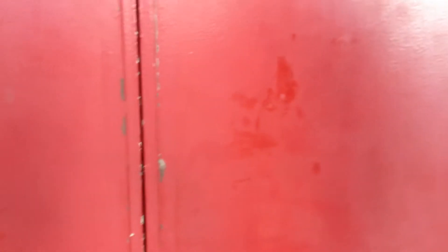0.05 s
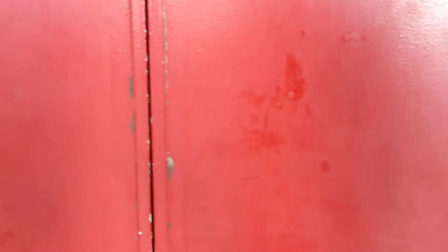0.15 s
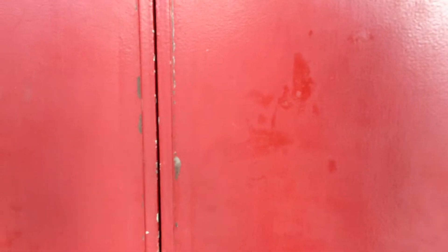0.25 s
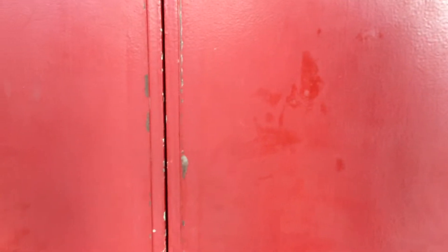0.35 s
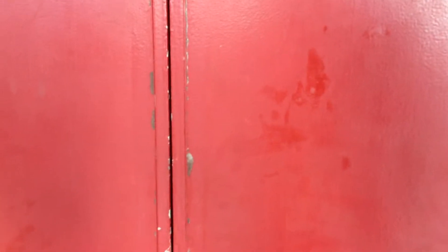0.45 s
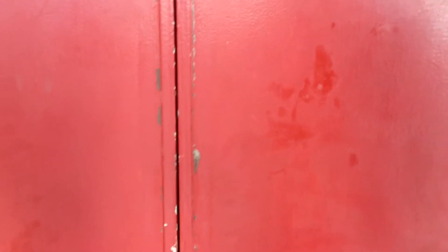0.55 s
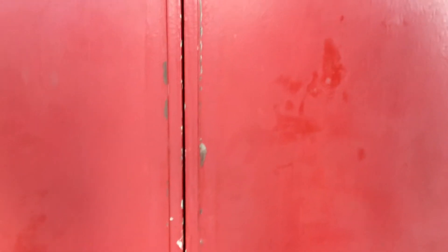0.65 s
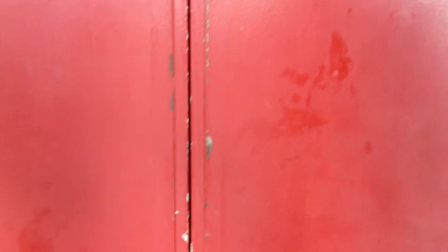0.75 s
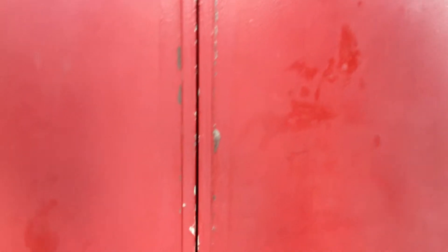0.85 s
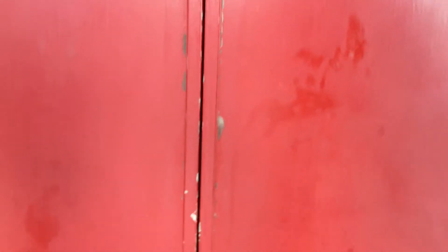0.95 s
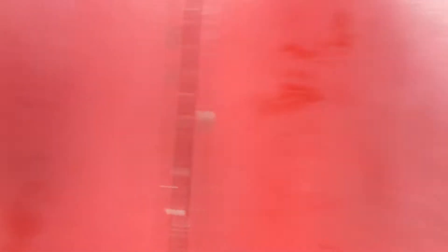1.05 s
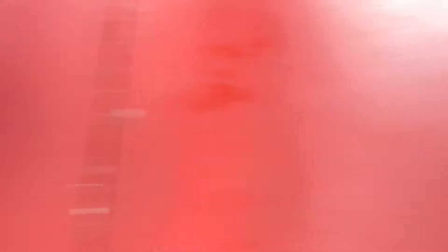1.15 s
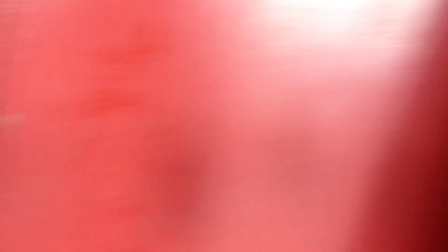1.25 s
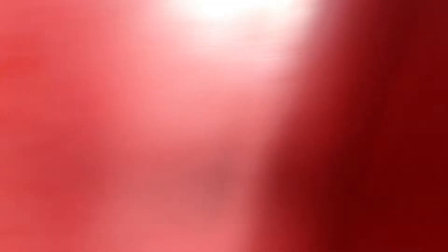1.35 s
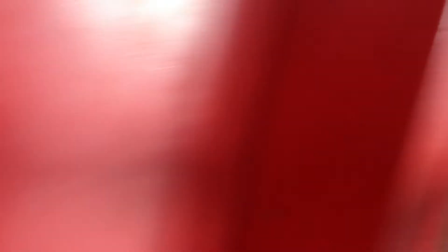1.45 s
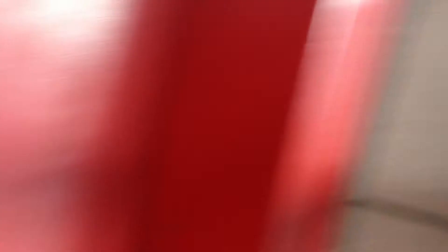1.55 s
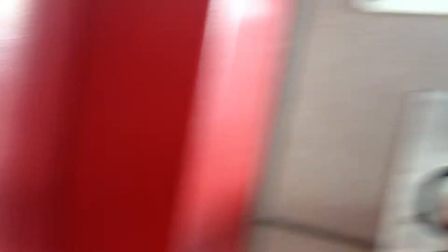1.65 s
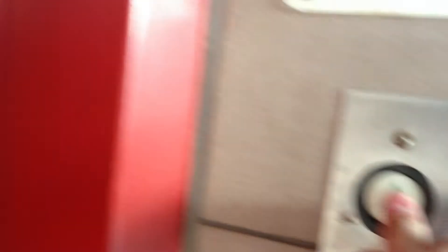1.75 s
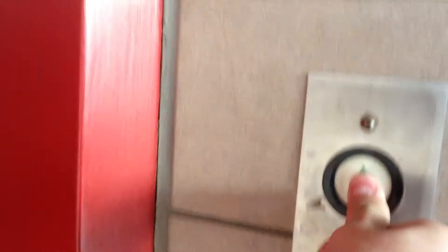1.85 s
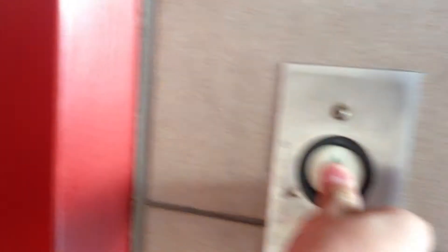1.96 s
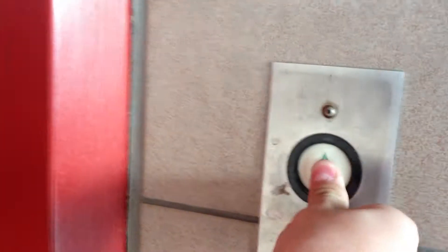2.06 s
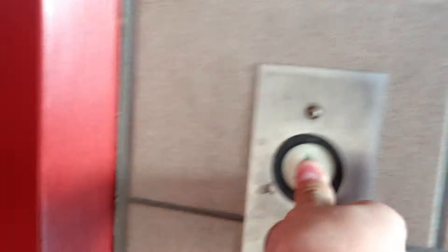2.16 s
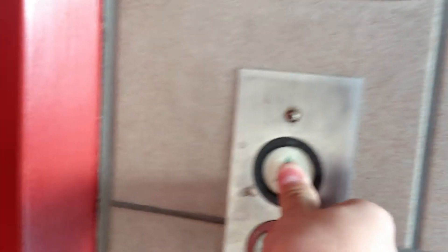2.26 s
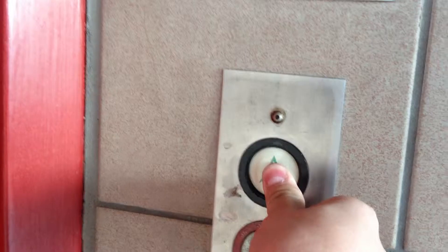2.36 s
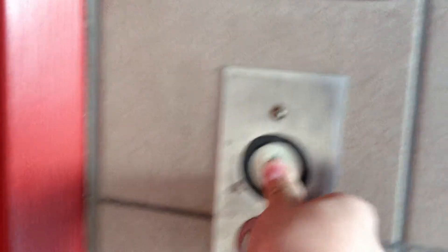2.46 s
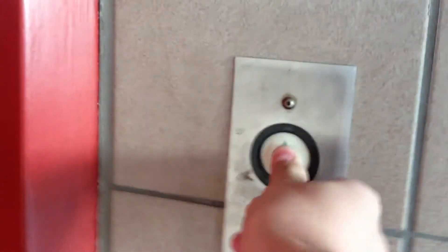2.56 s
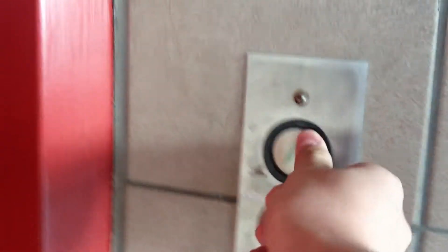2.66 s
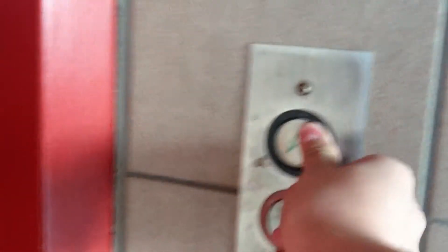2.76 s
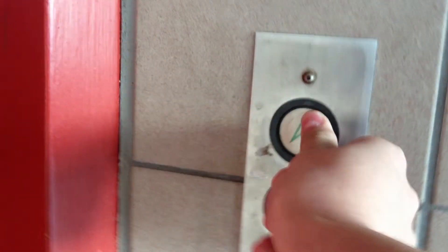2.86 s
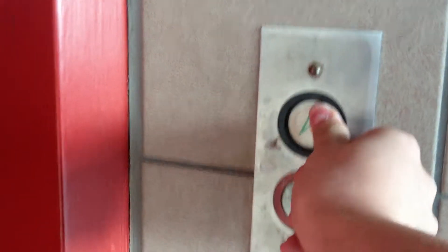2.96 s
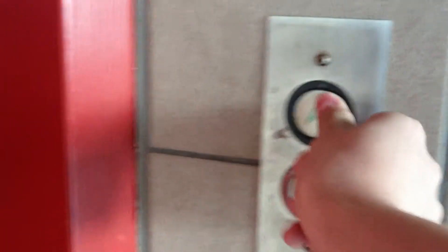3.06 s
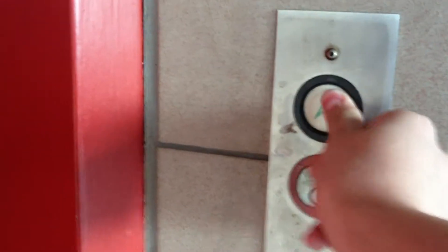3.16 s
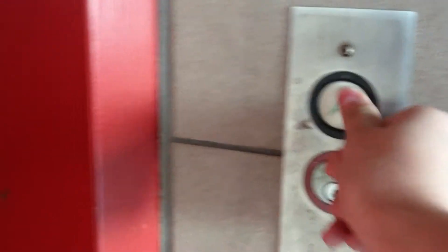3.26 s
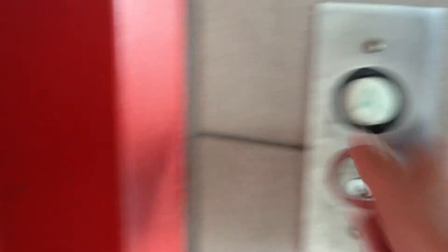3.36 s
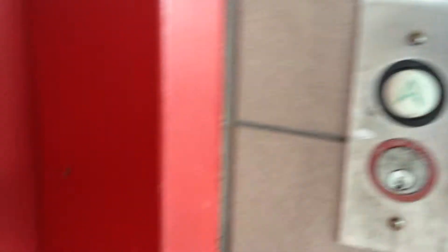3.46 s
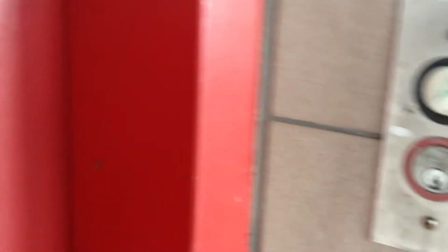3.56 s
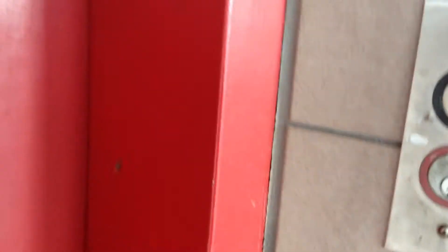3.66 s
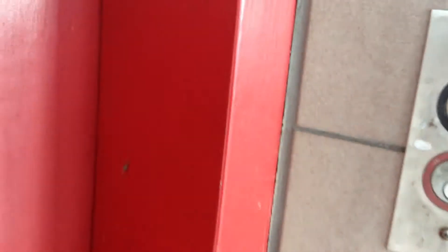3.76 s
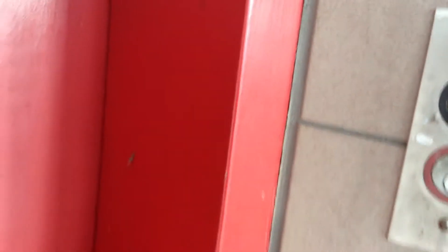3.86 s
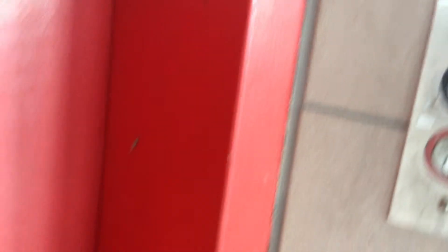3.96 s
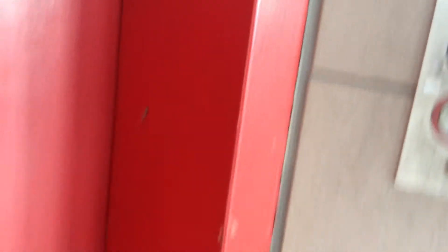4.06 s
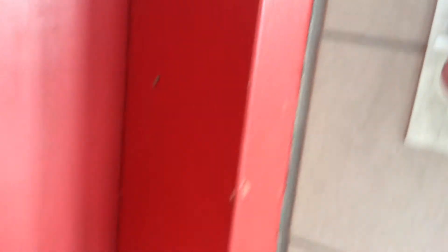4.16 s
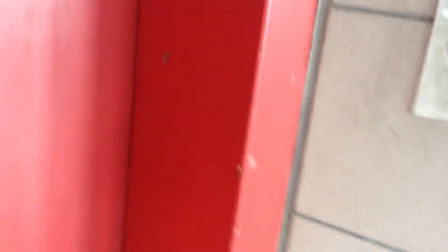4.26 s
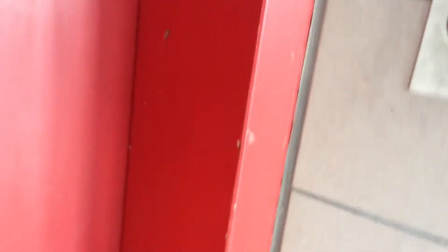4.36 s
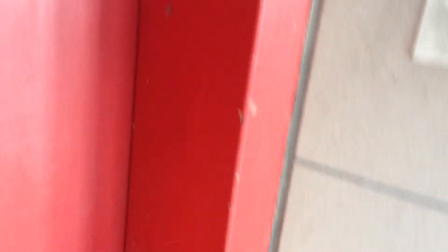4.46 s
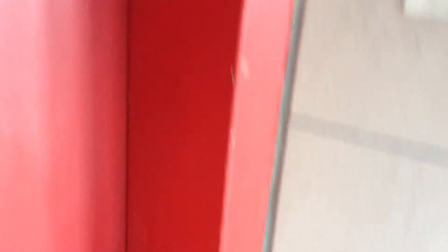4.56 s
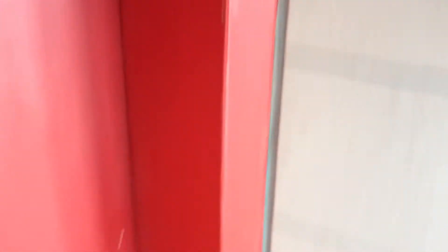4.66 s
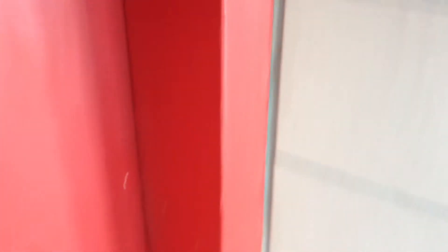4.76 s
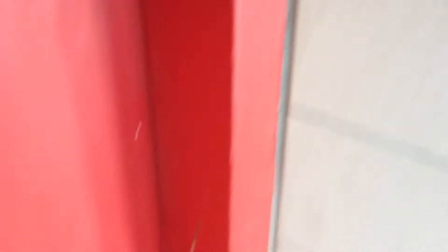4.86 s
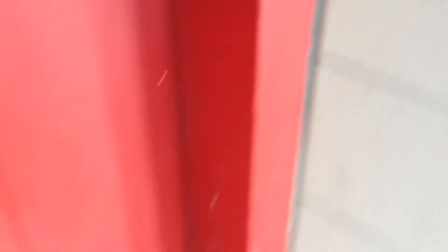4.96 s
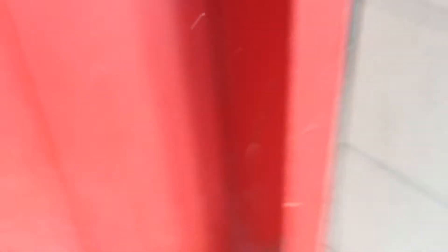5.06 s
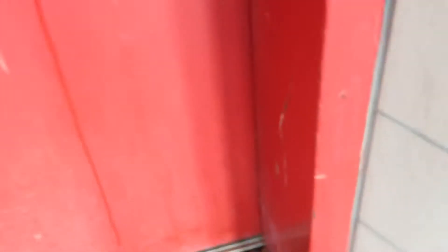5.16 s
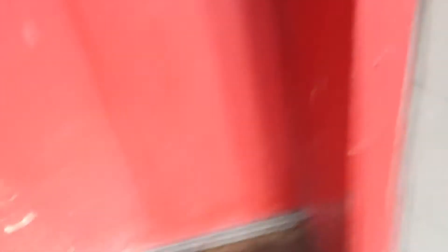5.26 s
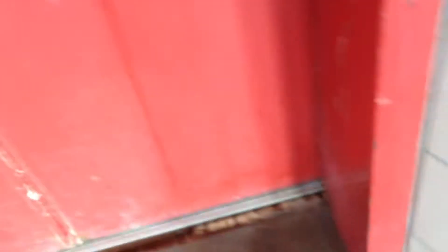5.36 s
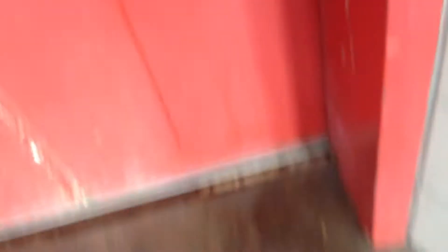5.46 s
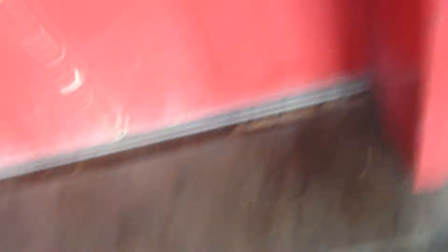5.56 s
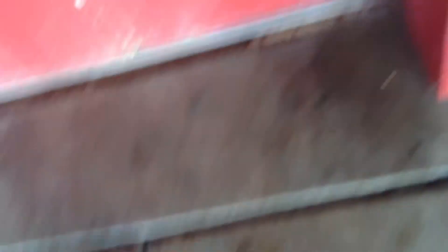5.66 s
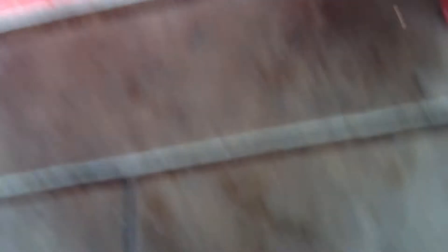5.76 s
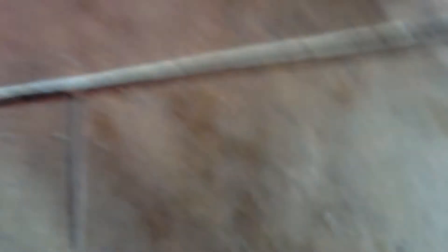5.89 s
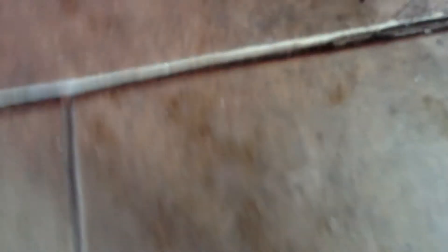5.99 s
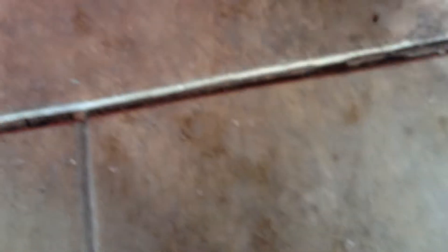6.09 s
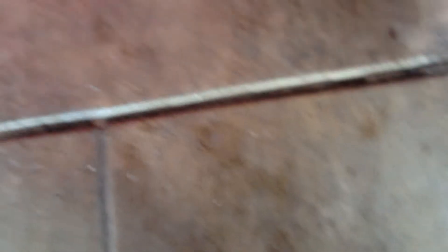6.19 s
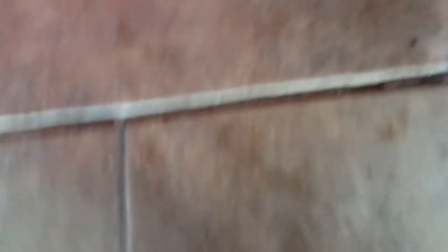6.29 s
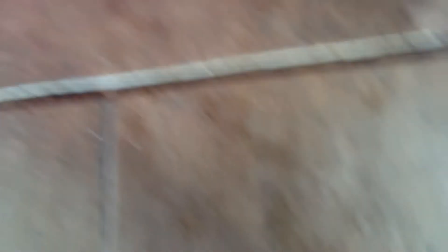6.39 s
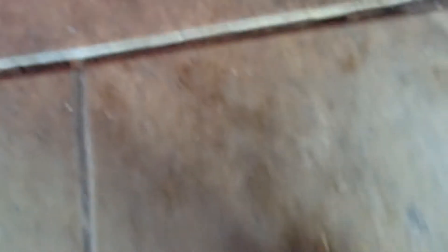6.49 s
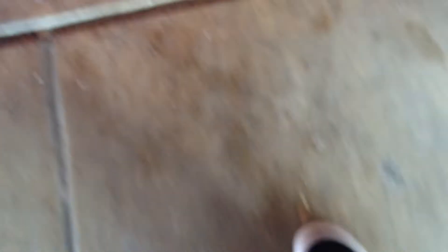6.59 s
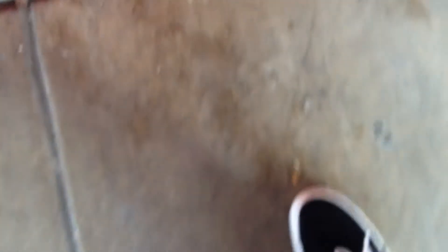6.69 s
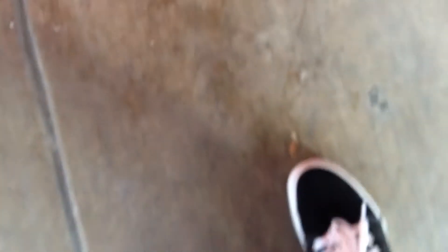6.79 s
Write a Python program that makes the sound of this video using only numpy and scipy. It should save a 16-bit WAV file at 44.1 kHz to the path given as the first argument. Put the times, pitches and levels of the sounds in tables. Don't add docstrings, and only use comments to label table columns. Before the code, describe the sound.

A loose call button clicks and rattles in quick bursts beside a lift door, over a low uneven engine hum and soft traffic noise.

```python
import sys
import numpy as np
from scipy import signal
from scipy.fft import rfft, irfft, next_fast_len
from scipy.io import wavfile
from scipy.ndimage import uniform_filter1d, map_coordinates

SR = 44100
rng = np.random.default_rng(int(sys.argv[2]) if len(sys.argv) > 2 else 0)


def makeup_ratio(level_db):
    decades = np.asarray(level_db, float) / 20
    return 10 ** decades


def store_wav(level_fs):
    pcm = np.round(np.clip(np.atleast_2d(level_fs), -1, 1) * 32767)
    wavfile.write(sys.argv[1], SR, pcm.T.astype(np.int16))


N = 301203
TIME = np.arange(N) / SR

# f/Hz, density/dB
HISS_SPECTRUM = [(1650, -15), (2800, -13.5), (3720, -8), (4050, -5.5), (5230, 4), (5740, 0.5), (6340, -8),
                 (9170, -24.5), (9990, -24.5), (12100, -17.5), (15300, -21.5)]


def unit(x):
    return x / np.sqrt(np.mean(x ** 2) + 1e-20)


def peak(x):
    return x / np.abs(x).max()


def along(points, hz):
    f, v = np.transpose(points)
    return np.interp(np.log(hz + 1), np.log(f + 1), v)


def curves(rows):
    s, *cols = np.transpose(rows)
    return [np.interp(TIME, s, c) for c in cols]


def wobble(rate):
    return map_coordinates(rng.standard_normal(int(N * rate / SR) + 4), [TIME * rate])


def gate(t0, t1, fade):
    return np.clip(np.minimum(TIME - t0, t1 - TIME) / fade, 0, 1)


def tone(hz, db):
    return np.sqrt(2) * makeup_ratio(db) * np.sin(2 * np.pi * (np.cumsum(hz) / SR + rng.random()))


def filtered(x, response):
    m = next_fast_len(len(x) + 4096)
    return irfft(rfft(x, m) * response(np.fft.rfftfreq(m, 1 / SR)), m)[:len(x)]


def ringing(x, modes):
    def response(f):
        total = 0
        for k, (centre, width, db) in enumerate(modes):
            damping = 1j * f * width
            total = total + (-1) ** k * makeup_ratio(db) * damping / (centre * centre - f * f + damping)
        return total
    return filtered(x, response)


def ringing_twice(x, modes):
    return ringing(ringing(x, modes), modes)


def rush(spectrum, patchy_db):
    z = signal.stft(rng.standard_normal(N + 512), nperseg=512)[2]
    field = uniform_filter1d(uniform_filter1d(rng.standard_normal(z.shape), 6, 0), 14, 1)
    x = signal.istft(z * makeup_ratio(patchy_db * unit(field)), nperseg=512)[1][:N]
    return unit(filtered(x, lambda hz: makeup_ratio(along(spectrum, hz))))


def add_at(out, s, sound):
    out[round(s * SR):][:len(sound)] += sound


def idling():
    # f/Hz, width/Hz, level/dB
    pipe = [
        [(140, 60, -6), (183, 55, 0)],
        [(297, 45, 0), (352, 60, -3)],
    ]
    # start t/s, length/s, level/dB, high over low resonance/dB
    surges = [(-.03, 0.039, -59, -8), (0.118, 0.062, -55, 0), (0.425, 0.099, -50.5, -1.5),
              (0.527, 0.19, -50, -28), (0.71, 0.095, -58, 6), (.84, 0.062, -55, -15),
              (0.993, 0.045, -51, 0.5), (1.168, 0.097, -45.5, -1), (1.363, 0.017, -45, 5),
              (1.496, 0.14, -47.5, -5), (1.679, 0.23, -42.5, -18), (1.835, 0.19, -45.5, -21),
              (2.056, 0.1, -39.5, -21), (2.197, 0.19, -51, -1.5), (2.406, 0.44, -47, -18)]
    firing_hz, edge_s, rest_db = 49.07, 0.029, -85
    turns = np.cumsum(firing_hz * (1 + .015 * wobble(5))) / SR
    fired = np.diff(np.floor(turns), prepend=0) * makeup_ratio(1.5 * rng.standard_normal(N))
    fired = fired * np.where(turns % 2 < 1, 1, .2)
    drive = unit(fired) + .55 * rng.standard_normal(N)
    low, high = makeup_ratio(rest_db), makeup_ratio(rest_db + 14.0)
    for s, length, db, over_db in surges:
        swell = gate(s, s + length + edge_s, edge_s)
        low = low + makeup_ratio(db) * swell
        high = high + makeup_ratio(db + over_db) * swell
    parts = [gain * unit(ringing_twice(drive, modes)) for gain, modes in zip([low, high], pipe)]
    return sum(parts) * gate(-1, 2.85, 0.55)


def stopping():
    # t/s, firing rate f/Hz, level/dB
    slowing = [
        (0.0, 93.4, -51),
        (.15, 93.4, -51),
        (.3, 93, -64),
        (.46, 92.5, -77),
        (.73, 86.1, -49),
        (.9, 87.5, -62),
    ]
    # t/s, f/Hz, level/dB
    whistle_path = [
        (.55, 1910, -72),
        (.76, 2107, -60),
        (.82, 2144, -53),
        (.92, 2216, -52.5),
        (1.0, 2280, -57),
        (1.04, 2300, -68),
    ]
    hz, db = curves(slowing)
    first = tone(hz, np.maximum(db, -56) - 5) * gate(-1, .55, .2)
    second = tone(2 * hz, db) * gate(-1, .95, .1)
    hz, db = curves(whistle_path)
    hz = hz * (1 + .012 * wobble(200))
    flutter_db = 4.5 * wobble(110) - 1
    whistle = tone(hz, db + flutter_db) + tone(2 * hz, db - 13)
    whistle = whistle + tone(3 * hz, -67 + flutter_db) * gate(.64, .9, .05)
    return first + second + whistle * gate(.53, 1.04, .03)


def street():
    # t/s, tyre roar level/dB
    traffic = [(0.0, -53.5), (0.95, -52), (1.27, -52), (3.14, -51), (3.42, -51.5), (4.93, -50), (5.34, -50),
               (5.76, -50.5), (6.83, -48.5)]
    # f/Hz, density/dB
    rumble_spectrum = [(20, -43), (40, -27.5), (80, -13), (150, 3.5), (250, -0.5), (380, -2.5),
                       (480, -19.5), (700, -78)]
    # f/Hz, density/dB
    roar_wall = [(260, -49), (450, -4), (840, -2), (927, -4), (1890, -3), (2830, -13), (3200, -19.5),
                 (4160, -15.5), (7040, -120)]
    roar_floor = [(280, -16), (480, -1), (642, -5.5), (1430, -9.5), (1550, -14.5), (2770, -16.5),
                  (4200, -17.5), (5460, -59), (9240, -120)]
    # t/s, share (0-1)
    tipping = [
        (5.45, 0),
        (5.85, 0.99),
    ]
    roar_db, = curves(traffic)
    swell_db = roar_db - roar_db.mean()
    hiss_db = -55.5 + 0.29 * swell_db + 0.4 * wobble(2.75)
    thinning_db = 2 * gate(2.6, 9, 2.1)
    rumble_db = -46.5 + swell_db - thinning_db + 0.68 * wobble(5.5)
    rumble = makeup_ratio(rumble_db) * rush(rumble_spectrum, patchy_db=-1.5)
    down = np.clip(curves(tipping)[0], 0, 1)
    roar = np.sqrt(1 - down) * rush(roar_wall, patchy_db=0.97)
    roar = roar + np.sqrt(down) * rush(roar_floor, patchy_db=1)
    return rumble + makeup_ratio(roar_db) * roar + makeup_ratio(hiss_db) * rush(HISS_SPECTRUM, patchy_db=1.0)


def contacts(out):
    # t/s, peak level/dB, cap ring f/Hz, tick level/dB, rattle level/dB
    clicks = [(1.6662, -35, 5400, -32, -18), (1.6787, -20, 5150, -33, -2), (1.726, -7, 5000, -18, -8),
              (2.6056, -28, 4950, -33, 3), (2.6105, -31, 5000, -22, -8), (2.6427, -25, 5000, -8, 1),
              (2.6575, -18, 5250, -27, 1), (2.727, -18, 5100, -28, -14), (2.7314, -23, 5300, -20, -4),
              (2.7424, -12, 4900, -16, -5), (2.8758, -26, 5200, -14, -6), (2.9154, -9.5, 5150, -17, -12),
              (2.9577, -14, 5140, -9, -7), (3.0982, -30, 5000, -20, -8), (3.1055, -15, 5100, -19, -10),
              (3.1168, -17, 5200, -28, -11), (3.168, -16, 5600, -15, -6), (3.17, -25, 5100, -2, -6),
              (3.24, -35, 4400, -27, -14), (3.258, -34, 5300, -27, -8), (3.2941, -27, 5350, -28, -2),
              (3.3158, -11.5, 5200, -20, -14)]
    # f/Hz, width/Hz, level/dB
    plate_modes = [(620, 300, -3), (900, 350, -3), (1400, 600, -7), (2100, 380, -1), (3600, 500, 1)]
    tick_modes = [(8950, 1300, -4), (12650, 2540, 2), (13770, 1600, 3.5)]
    t, lead = np.arange(2048) / SR, 600
    swell_in = makeup_ratio(-25.5) * np.linspace(0, 1, lead)
    still = 0 * swell_in
    for s, db, hz, tick_db, rattle_db in clicks:
        loose = makeup_ratio(rattle_db - 5 - 60 * t / .045 + 3 * wobble(700)[:len(t)])
        snap = makeup_ratio(-60 * t / .005) * (1 - np.exp(-t / .0002))
        grit = rng.standard_normal(lead + len(t))
        drive = np.r_[swell_in, snap + loose] * grit
        buzz = np.r_[still, .5 * makeup_ratio(-60 * t / .009)] * np.roll(np.sign(drive), 40)
        chatter = np.r_[swell_in, snap + .45 * loose] * grit + buzz
        drive[lead + 12] += 5
        cap_modes = [(hz * .88, 700, -8), (hz, 900, 0), (hz * 1.24, 1000, -3)]
        cap = ringing(ringing(ringing(drive, cap_modes), [(5100, 2000, 0)]), [(5100, 2400, 0)])
        tick = ringing(ringing(chatter, tick_modes), [(11600, 12000, 0)])
        shake = np.r_[still, makeup_ratio(-60 * t / .045) * (1 - np.exp(-t / .001))]
        shake = shake * rng.standard_normal(len(drive))
        plate = ringing(ringing(shake, plate_modes), [(1440, 1060, 4), (3880, 200, -14)])
        plate_db = -1 + 1.11 * min(tick_db, -16)
        sound = peak(cap) + makeup_ratio(tick_db + 9.5) * peak(tick) + makeup_ratio(plate_db) * peak(plate)
        add_at(out, s - lead / SR, makeup_ratio(db) * sound)


def bounces(out):
    # t/s, peak level/dB, f/Hz, t60/ms
    rebounds = [(1.6818, -32, 5300, 14), (1.6876, -31, 5100, 12), (1.7283, -12, 5200, 9),
                (1.7296, -18, 5500, 8), (1.731, -23, 5400, 9), (1.7326, -24, 5400, 9),
                (1.7344, -24, 5400, 9), (1.7372, -28, 5500, 9), (1.7468, -30, 5400, 9),
                (1.7498, -29, 5500, 9), (2.6437, -14, 5030, 16), (2.6455, -18, 5030, 13),
                (2.6505, -29, 5700, 9), (2.6532, -27, 5120, 9), (2.6593, -21, 5500, 10),
                (2.6612, -22, 5250, 9), (2.7279, -17, 5500, 7), (2.7323, -23, 5500, 6),
                (2.7434, -13, 5200, 6), (2.7453, -22, 5400, 14), (2.7473, -23, 5100, 12),
                (2.877, -23, 4900, 8), (2.9168, -12, 5900, 12), (2.9188, -19, 5300, 9),
                (2.9203, -23, 5200, 8), (2.922, -22, 5620, 10), (2.9293, -26, 5400, 8),
                (2.959, -18, 5000, 8), (2.961, -23, 5200, 10), (2.9624, -21, 4800, 10),
                (2.9641, -21, 5500, 8), (2.9696, -26, 5730, 10), (3.1071, -15, 5300, 11),
                (3.1101, -24, 5200, 8), (3.1122, -24, 5570, 14), (3.1184, -17, 5600, 9),
                (3.1197, -21, 5500, 7), (3.1245, -27, 5450, 14), (3.1713, -20, 5200, 10),
                (3.1724, -21, 5500, 9), (3.1735, -21, 5300, 10), (3.1748, -21, 5500, 9),
                (3.3171, -14, 5300, 7), (3.3192, -20, 5100, 14), (3.3222, -26, 5300, 9),
                (3.3257, -27, 5400, 10), (3.3322, -29, 5230, 8)]
    t = np.arange(2048) / SR
    for s, db, hz, t60_ms in rebounds:
        decay = makeup_ratio(-6e4 * t / t60_ms) * (1 - np.exp(-t / .0004))
        ring = decay * (np.sin(2 * np.pi * hz * t) + .22 * np.sin(2.36 * np.pi * hz * t))
        knock = .12 * makeup_ratio(-60 * t / .003) * np.sin(5.1 * np.pi * hz * t)
        add_at(out, s, makeup_ratio(db) * peak(ring + knock))


def squeaks(out):
    # t/s, length/s, f/Hz, level/dB
    slips = [
        (2.638, .0055, 4900, -25),
        (2.9062, .0055, 4720, -21),
        (2.897, .01, 5000, -34),
        (3.3045, .009, 4750, -27),
    ]
    t = np.arange(2048) / SR
    for s, length, hz, db in slips:
        swell = np.sin(np.pi * np.clip(t / length, 0, 1)) ** 0.35
        rub = swell * (rng.standard_normal(len(t)) + np.sin(2 * np.pi * hz * t))
        grit = makeup_ratio(-16) * peak(ringing_twice(rub, [(13200, 2000, 0)]))
        add_at(out, s, makeup_ratio(db) * (peak(ringing_twice(rub, [(hz, 500, 0)])) + grit))


def thuds(out):
    # t/s, f/Hz, peak level/dB
    knocks = [
        (2.648, 850, -32),
        (2.958, 900, -36),
        (3.17, 750, -38),
        (3.316, 650, -38),
        (5.565, 800, -38),
        (4.14, 540, -42),
    ]
    t = np.arange(2048) / SR
    for s, hz, db in knocks:
        burst = makeup_ratio(-60 * t / .05) * rng.standard_normal(len(t))
        add_at(out, s, makeup_ratio(db) * peak(ringing_twice(burst, [(hz, 600, 0)])))


def button():
    out = np.zeros(N + SR)
    contacts(out)
    bounces(out)
    squeaks(out)
    thuds(out)
    return out[:N]


def hall(x):
    # f/Hz, t60/s
    decay_times = [(600, 0.3), (2000, .15), (5000, 0.25), (12000, 0.19)]
    out, step = np.zeros(N + SR), SR // 4
    for i in range(0, N, step):
        hz, t, z = signal.stft(rng.standard_normal(SR // 3), SR, nperseg=256)
        tail = signal.istft(z * makeup_ratio(-60 * t / along(decay_times, hz)[:, None]), SR, nperseg=256)[1]
        wet = signal.fftconvolve(x[i:i + step], tail / np.linalg.norm(tail))
        out[i + 90:][:len(wet)] += wet
    return out[:N]


def pulling():
    # t/s, firing rate f/Hz, exhaust level/dB
    drive_off = [(2.2, 59.8, -44), (2.45, 57.37, -40), (2.71, 56.42, -43), (2.85, 58.4, -40.5),
                 (2.96, 61.77, -41), (3.08, 53.56, -40), (3.17, 58.62, -41), (3.5, 59.96, -44),
                 (3.66, 62.9, -41), (4.28, 66.84, -43), (4.39, 66.94, -49), (4.49, 68.6, -42.5),
                 (5.2, 72.7, -44.5), (5.62, 72.97, -41), (6.2, 74.96, -41), (6.62, 75.06, -40),
                 (6.71, 76.1, -53), (6.83, 74.7, -47.5)]
    # order, level/dB
    strong_orders = [(2, -6.5), (3, -3), (4, -5.5), (5, -5.5)]
    weak_orders = [(1, -29), (1.5, -55), (2.5, -15), (3.5, -12.5), (4.5, -13.5), (5.5, -17), (6, -13.5),
                   (7, -32)]
    # f/Hz, level/dB
    muffler = [(90, -6), (140, -7.5), (390, -2.5), (430, -8), (520, 3.5)]
    # f/Hz, width/Hz, level/dB
    deck_waves = [(115.4, 16.4, -10), (144.3, 5.3, 10.5), (147.4, 2.5, -6.5), (181, 17, -3), (211, 12, 2.5),
                  (228.2, 4.9, -4), (270.5, 3.9, -3), (280, 7.2, 3.5), (293.7, 4.6, -9.5),
                  (299.8, 7.8, 8.5), (328.5, 2.8, -7.5), (360.8, 4.3, 3), (392, 6.1, -0.5), (426, 11, -22)]
    # t/s, half length/s, order, level/dB
    pillars = [(2.4, 0.22, 2.5, 7), (2.606, .12, 5, 1), (2.88, 0.074, 3, 8.5), (2.95, 0.043, 5, -3.5),
               (3.053, .1, 4, 1), (3.104, 0.057, 3, -6), (2.8, 0.22, 6, 5), (3.4, 0.25, 6, 8.5),
               (3.212, 0.05, 5, 11.5), (3.347, 0.064, 5, 8), (3.463, 0.062, 3, 8), (3.63, 0.1, 3, -4.5),
               (3.7, 0.24, 2, 6), (3.85, 0.071, 3, 5.5), (4.1, 0.071, 5, -4), (4.244, 0.057, 3, 7.5),
               (4.535, 0.08, 5, 2.5), (4.803, 0.14, 2, -2.5), (5.101, 0.077, 4, -6), (5.155, 0.43, 5.5, 5),
               (5.271, .1, 4, -11), (5.58, 0.098, 4, 6), (5.624, .1, 2, 5), (5.83, 0.042, 4, -26),
               (5.925, 0.059, 4, 6.5), (6.054, 0.075, 4, -7.5), (6.057, 0.045, 5, -12), (6.349, 0.34, 4, 3),
               (6.549, .06, 5, 0.5), (6.289, 0.12, 5, 1.5), (5.502, 0.058, 3, 1), (6.399, 0.24, 2, -1),
               (6.257, 0.066, 3, -1.5), (6.4, 0.12, 6, 2)]
    hz, effort_db = curves(drive_off)
    shaky = hz * (1 + 0.00436 * (71.95 / hz) ** 3.55 * wobble(20))

    def decks_db(f):
        return sum(db * np.exp(-((f - c) / w) ** 2) for c, w, db in deck_waves)

    def pillars_db(k):
        return sum(db * np.exp(-((TIME - s) / half) ** 2)
                   for s, half, order, db in pillars if abs(order - k) < 1 / 4)

    out = np.zeros(N)
    for k, db in strong_orders:
        flicker_db = 1.1 * wobble(18) + .7 * wobble(6)
        out += tone(shaky * k, effort_db + db + decks_db(hz * k) + pillars_db(k) + flicker_db)
    for k, db in weak_orders:
        path_db = along(muffler, hz * k) + decks_db(hz * k) / 2 + pillars_db(k)
        out += tone(shaky * k, effort_db + 2.5 + db + path_db + 1.4 * wobble(5.7))
    return out * gate(2.23, 9, 0.45)


def creaks():
    # t/s, peak level/dB near 5, 7 and 12 kHz
    releases = [(2.4664, -50, -56, -44), (2.5705, -38, -46, -44), (3.847, -40, -52, -48),
                (5.197, -44, -54, -52), (5.3249, -46, -41, -50), (5.5534, -48, -53, -46),
                (5.5624, -48, -57, -48), (5.5724, -48, -49, -50), (5.5997, -33, -44, -48),
                (5.6038, -40, -40, -37), (5.79, -44, -62, -62), (5.9245, -52, -58, -51)]
    # f/Hz, width/Hz
    case_modes = [(5300, 2200), (6700, 2200), (12500, 4000)]
    # f/Hz, width/Hz, level/dB
    snap_modes = [(5150, 1100, 0), (6900, 2400, -5)]
    out, t = np.zeros(N + SR), np.arange(512) / SR
    for s, *levels in releases:
        drive = makeup_ratio(-60 * t / .004) * rng.standard_normal(len(t))
        for db, (hz, width) in zip(levels, case_modes):
            mode = [(hz, 1.25 * width, 0)]
            add_at(out, s, makeup_ratio(db) * peak(ringing(ringing_twice(drive, mode), mode)))
    blow = 1. * (np.arange(len(t)) == 8)
    snap = ringing(ringing(blow, snap_modes), [(5600, 3000, 0)])
    add_at(out, 5.6039, makeup_ratio(-13.5) * peak(snap))
    return out[:N]


def scuffs():
    # start t/s, length/s, level/dB, treble tilt/dB
    rubs = [(3.766, 0.075, -48.5, 0), (3.845, 0.014, -45.5, -3), (4.474, 0.12, -56, -3),
            (4.65, 0.21, -56.5, -6), (5.54, 0.06, -62, 16), (5.594, 0.023, -42, 3), (5.919, 0.033, -56, 7),
            (5.94, 0.073, -56, 3), (6.039, 0.096, -50, 0), (6.727, 0.045, -50, 8), (6.739, 0.1, -55.5, 7)]
    dull = makeup_ratio(2.2 * wobble(220)) * rush(HISS_SPECTRUM, 0.33)
    bright = filtered(dull, lambda hz: np.clip(hz / 3000 - 2, 0, 1))
    out = np.zeros(N)
    for s, length, db, tilt_db in rubs:
        out += makeup_ratio(db) * gate(s, s + length, length / 3) * (dull + (makeup_ratio(tilt_db) - 1) * bright)
    return out


def scene():
    # f/Hz, level/dB
    port = [(3000, 0), (7400, -3), (8600, 0), (9300, -7), (9800, -10), (10600, 1)]
    cars = idling() + stopping() + pulling()
    near = button()
    close = near + makeup_ratio(-11.5) * hall(near) + creaks()
    close = filtered(close, lambda hz: makeup_ratio(along(port, hz)))
    return (close + scuffs() + cars + street())[None]


def low_pass(x):
    return signal.sosfilt(signal.butter(12, 16470, fs=SR, output="sos"), x)


def record(dry):
    edge_hz = 15350
    kept = filtered(dry[0], lambda hz: np.where(hz < edge_hz, 1, makeup_ratio(-27)))
    return low_pass(kept[None])


dry = scene()
out = record(dry)
store_wav(out)
```